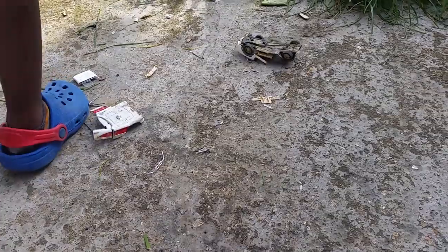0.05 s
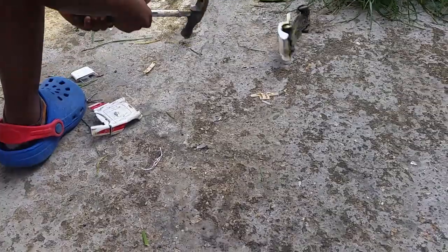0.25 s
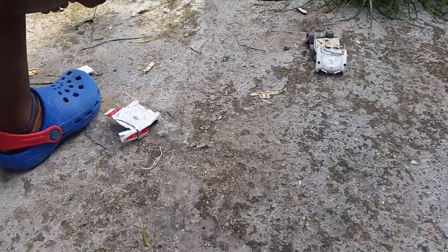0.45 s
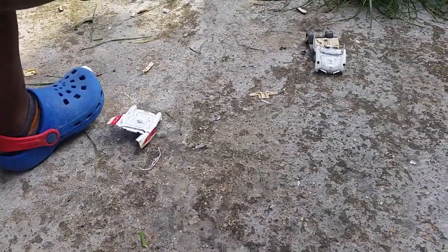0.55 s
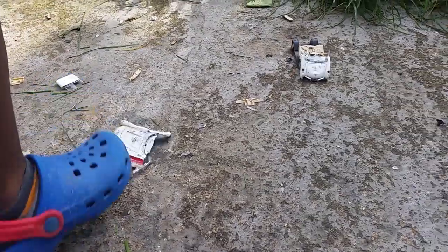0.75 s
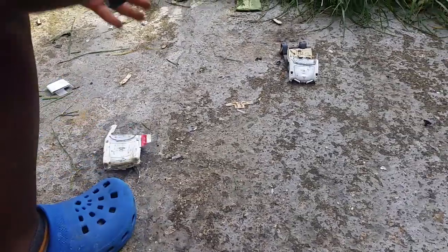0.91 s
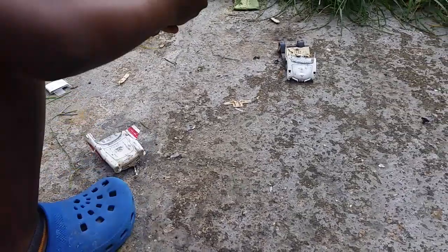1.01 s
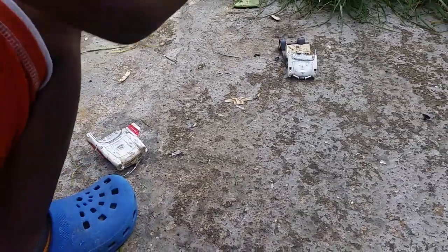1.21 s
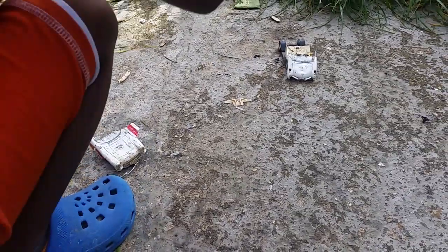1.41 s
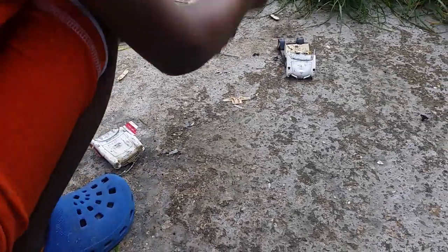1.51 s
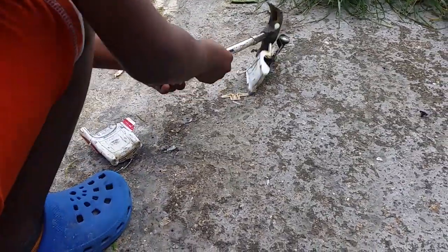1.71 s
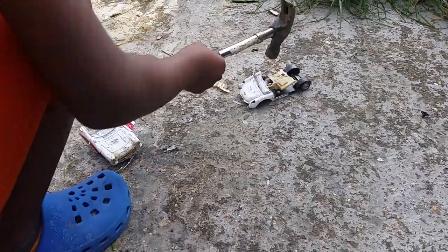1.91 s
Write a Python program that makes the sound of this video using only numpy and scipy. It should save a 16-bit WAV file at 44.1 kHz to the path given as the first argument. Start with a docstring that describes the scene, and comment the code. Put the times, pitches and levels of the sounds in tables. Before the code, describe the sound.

Close stereo microphone in a small yard: a shoe scuffs and a thin panel chatters, a hard hammer blow crunches a toy car with a hollow rebound, bits settle, clothes brush softly, then another blow and clatter.

```python
"""Toy car under the hammer

A hammer smashes a plastic toy car on a concrete yard, twice; the car jumps and clatters down.
Crunches, clacks and scrapes are shaped bursts of noise; thuds, knocks and pings are dying sines.
A clog scuffs the ground and nudges a loose panel, which chatters over the concrete.
Filtered noise gives rumble, brushing clothes, a thin whistle and the yard's short tail; low tones waver."""
import sys
import numpy as np
from scipy import signal
from scipy.fft import rfft, irfft
from scipy.io import wavfile
from scipy.ndimage import uniform_filter1d

SR = 44100
rng = np.random.default_rng(int(sys.argv[2]) if len(sys.argv) > 2 else 0)


def waveform_to_disk(signal):
    """Save audio, clipped to [-1, 1], as 16-bit WAV at the path in sys.argv[1]."""
    frames = np.transpose(np.atleast_2d(signal))
    scaled = np.clip(frames, -1, 1) * 32767
    samples = np.round(scaled).astype(np.int16)
    wavfile.write(sys.argv[1], SR, samples)


N = 85995
T = np.arange(N) / SR  # scene time [s]
AGE = T[:SR // 3]  # time since a single hit [s]
HZ = np.fft.rfftfreq(4096, 1 / SR)  # frequency grid of the colour filters [Hz]


def amp(db):
    """Decibels to gain."""
    return 10 ** (np.asarray(db) / 20)


def unit(x):
    """Scales to rms 1."""
    return x / np.sqrt(np.mean(x ** 2) + 1e-20)


def pan(db):
    """Left and right gains for a left-right difference."""
    return amp([[db / 2], [-db / 2]])


def read(points, hz):
    """Reads a (frequency, value) table on a log-frequency axis."""
    table_hz, value = np.transpose(points)
    return np.interp(np.log(hz + 1), np.log(table_hz), value)


def level(points):
    """Gain over the scene from (time, level) points."""
    return amp(np.interp(T, *np.transpose(points)))


def onset(rise_s):
    """Straight rise from silence to full level."""
    return np.minimum(AGE / rise_s, 1)


def add(mix, s, sound):
    """Mixes a sound in at a time, trimming what falls outside the scene."""
    at = round(s * SR)
    sound = sound[..., max(-at, 0):]
    part = mix[:, max(at, 0):][:, :sound.shape[-1]]
    part += sound[..., :part.shape[1]]


def minimum_phase(log_gain):
    """Full spectrum of the causal filter whose energy comes earliest for this gain."""
    mirrored = np.r_[log_gain, log_gain[-2:0:-1]]
    return np.exp(np.conj(signal.hilbert(mirrored)))


def colour(x, db):
    """Causal filter of unit energy, shaped by the given gain over HZ."""
    taps = np.fft.ifft(minimum_phase(np.log(amp(db)))).real[:len(HZ)]
    return signal.oaconvolve(x, taps[None] / np.linalg.norm(taps), axes=1)[:, :N]


def dull(x, hz):
    """A soft contact carries little treble: a steep low-pass."""
    return signal.sosfilt(signal.butter(5, hz, fs=SR, output="sos"), x)


def lag(x, s):
    """The right microphone hears a source on the left a little later."""
    late = np.exp(-2j * np.pi * np.fft.rfftfreq(2 * N, 1 / SR) * s)
    right = irfft(rfft(x[1], 2 * N) * late)[:N]
    return np.array([x[0], right])


def pair(likeness, size):
    """Left and right noises with the given correlation."""
    a, b = rng.standard_normal((2, size))
    return np.array([a, likeness * a + np.sqrt(1 - likeness ** 2) * b])


LIKENESS = 0.33  # left-right correlation of grit and crumbs
GRIT_DB = 2  # unevenness of the grit, rms [dB]


def grit(db, rise, hold, t60):
    """A burst of tiny slips and fractures that rises, holds and dies."""
    wander = unit(uniform_filter1d(rng.standard_normal(len(AGE)), size=24))
    clumps = unit(amp(GRIT_DB * wander))
    fade_db = -60 * np.maximum(AGE - rise - hold, 0) / t60
    return pair(LIKENESS, len(AGE)) * clumps * onset(rise) * amp(db + fade_db)


RIPPLE_HZ = 149.66  # spacing of the random peaks and dips in tone [Hz]


def uneven_tone(x, ripple_db):
    """Each burst gets its own random uneven tone colour."""
    hz = np.fft.rfftfreq(len(AGE), 1 / SR)
    heights = np.tanh(rng.standard_normal(len(HZ)))
    ripple = np.interp(hz / RIPPLE_HZ, np.arange(len(HZ)), heights)
    response = minimum_phase(np.log(unit(amp(ripple_db * ripple))))
    return np.fft.ifft(np.fft.fft(x) * response).real


def ring(modes, pitch=1):
    """Struck modes dying away; pitch multiplies their frequencies."""
    out = np.zeros(len(AGE))
    for hz, db, t60 in modes:
        out += amp(db - 60 * AGE / t60) * np.sin(2 * np.pi * hz * pitch * AGE)
    return out


BLOW_LAG_S = .00029  # later arrival of the blows at the right microphone
# hammer crushing the car: (time [s], level [dB], hold [s], fade t60 [s])
CRUSHES = [(0.2317, -8.5, 0.0036, 0.063), (0.2417, -13.5, .002, 0.033), (1.6699, -28.5, 0.006, .035),
           (1.692, -35.5, 0.0055, 0.16), (1.711, -40.5, 0.0083, 0.17)]
# tone of the crunch: (frequency [Hz], relative level [dB])
CRUSH_COLOUR = [(150, -15), (500, -1), (1400, 4), (2400, -0.5), (4000, 1.5), (6500, 6), (9000, -1),
                (12000, -2), (14800, 4.5), (16000, 2)]
# thuds of the hammer, the car and a foot on the ground:
# (time [s], level [dB], pitch [Hz], t60 [s], left-right difference [dB])
THUDS = [(0.234, -6, 412, 0.019, -4), (0.2321, -10, 215, 0.019, -3.5), (0.2423, -10, 121, 0.0089, -29.5),
         (0.2434, -9.5, 363, 0.0071, -7), (.320, -27.5, 79.5, 0.077, -1), (.526, -42, 55, 0.11, -1),
         (0.971, -34.5, 135, 0.031, 0), (1.6724, -12.5, 361.6, 0.015, -2), (1.68, -29, 90, 0.041, -7)]


def hammer(crack_s=0.00063, push_s=0.00077):
    """Plastic crunches as bursts of fractures under the head; the ground thuds as dying sines."""
    crunch, thuds = np.zeros((2, 2, N))
    for s, db, hold, t60 in CRUSHES:
        add(crunch, s, uneven_tone(grit(db, crack_s, hold, t60), ripple_db=4.5))
    for s, db, hz, t60, side_db in THUDS:
        add(thuds, s, pan(side_db) * onset(push_s) * ring([(hz, db, t60)]))
    return pan(db=-1.05) * colour(crunch, read(CRUSH_COLOUR, HZ)) + thuds


REBOUND_S, REBOUND_DB = .2677, -8.5
# hollow modes of the rebounding piece: (frequency [Hz], relative level [dB], t60 [s])
REBOUND_MODES = [(450, 1, 0.018), (1060, 0, 0.014), (1292, 3, 0.014), (1680, -4.5, .012)]


def rebound(edge_hz=2000, rise_s=0.00065):
    """One loud, hollow knock as a piece rebounds: a few modes with the click filtered away."""
    out = np.zeros((2, N))
    add(out, REBOUND_S, amp(REBOUND_DB) * onset(rise_s) * ring(REBOUND_MODES))
    return dull(out, edge_hz)


# the car landing and rocking: (time [s], level [dB], t60 [s], ring relative to the clack [dB])
CLACKS = [(0.31, -45, .02, -15), (.3167, -25.5, 0.018, -9), (0.4054, -35.5, 0.042, -2),
          (0.442, -59, 0.037, -21), (0.5093, -40, 0.061, -10), (0.5264, -39, 0.027, -23),
          (0.9679, -49, 0.035, -18), (1.781, -47, 0.072, -32), (1.794, -48.5, 0.047, -11),
          (1.813, -52.5, 0.11, -18), (1.829, -43, 0.027, -14), (1.839, -44, 0.14, -13),
          (1.8478, -33.5, 0.03, -4.5), (1.898, -54, 0.07, -18), (1.9127, -50.5, .018, -25),
          (1.93, -56, 0.024, -5)]
# tone of the clacks, shared by the crumbs: (frequency [Hz], relative level [dB])
CLACK_COLOUR = [(150, -18), (500, 5.5), (1400, 6), (2200, 5.5), (4000, 5), (6500, 10.5), (9000, -1),
                (12500, 1.5), (15000, 5.5), (16000, -2)]
# chassis modes: (frequency [Hz], relative level [dB], t60 [s])
CAR_MODES = [(423.7, -2, 0.027), (932, 3, 0.015), (1190, -0.5, .03)]
# a steel axle pinging on two hard landings: (time [s], level [dB])
PINGS = [(.406, -48), (1.848, -50)]
# axle modes: (frequency [Hz], relative level [dB], t60 [s])
AXLE_MODES = [(1518, 0, .115), (2630, -4, .08), (3844, -12, .08)]


def car(contact_s=0.00069):
    """Each landing is a gritty clack and a knock of the chassis modes; two also ring an axle."""
    clacks, rings = np.zeros((2, 2, N))
    for s, db, t60, ring_db in CLACKS:
        add(clacks, s, grit(db, contact_s, 0.00086, t60))
        add(rings, s, amp(db + ring_db) * ring(CAR_MODES) / 2)
    for s, db in PINGS:
        add(rings, s, amp(db) * ring(AXLE_MODES))
    clacks = pan(db=-1.5) * colour(clacks, read(CLACK_COLOUR, HZ))
    return lag(clacks, BLOW_LAG_S) + pan(db=3.5) * rings


CRUMBS_PER_S, CRUMB_SPREAD_DB, CRUMB_T60_S = 57, 2.5, .014
# how loudly crumbs fall: (time [s], level [dB])
CRUMB_LEVEL = [(.25, -68), (.36, -58), (.6, -55.5), (.8, -71), (1.05, -70.5), (1.3, -105), (1.66, -105),
               (1.69, -50), (1.95, -68.5)]


def crumbs():
    """Splinters and grit patter down: randomly timed short ticks of noise, loudest after the blows."""
    landed = rng.random(N) < CRUMBS_PER_S / SR
    sizes = amp(CRUMB_SPREAD_DB * rng.standard_normal(N))
    falls = landed * sizes * level(CRUMB_LEVEL)
    fades = signal.oaconvolve(falls, amp(-60 * AGE / CRUMB_T60_S))[:N]
    return colour(fades * pair(LIKENESS, N), read(CLACK_COLOUR, HZ))


# the loose panel chattering over concrete: (time [s], level [dB], rise [s], hold [s], t60 [s])
CHATTERS = [(-.004, -40.5, 0.0045, 0.005, 0.059), (0.0211, -26.5, 0.0018, 0.0012, .022),
            (.031, -36.5, 0.0016, .004, 0.12), (0.045, -29, .001, 0.0025, 0.052),
            (0.143, -35, .008, 0.014, .025), (0.256, -34.5, 0.0018, 0.03, 0.18),
            (0.5542, -43, 0.00066, 0.0012, 0.036), (0.563, -43.5, 0.0025, 0.0016, 0.044),
            (0.577, -47, .003, 0.0074, 0.028), (.586, -44, 0.0025, 0.0018, 0.024),
            (0.613, -49, 0.0059, 0.018, 0.033), (0.664, -60, 0.0031, 0.0054, 0.043),
            (0.807, -45, 0.0055, 0.0085, 0.036), (0.853, -40, 0.0012, 0.0049, 0.047),
            (0.88, -39, 0.0039, 0.0047, 0.086), (0.901, -44.5, 0.0048, 0.0052, 0.13),
            (0.932, -44, .003, .003, 0.053), (1.066, -53, .001, .004, 0.075),
            (1.105, -55.5, 0.0021, .006, .04), (1.11, -55, 0.0039, 0.0063, 0.075),
            (1.164, -76, 0.0042, 0.0069, 0.095), (1.711, -38.5, 0.0044, 0.0055, 0.043)]
# broad tone of the panel: (frequency [Hz], relative level [dB])
PANEL_COLOUR = [(200, -22.5), (1000, -11), (1800, -8), (2900, -5.5), (4200, -14.5), (5400, -4.5), (7000, 5),
                (8200, 0), (9000, -11), (10500, -8.5), (12700, -4), (15000, -8), (16000, -6.5)]
# resonances of the panel: (frequency [Hz], width [Hz], lift [dB])
PANEL_MODES = [(2130, 130, 6), (2900, 170, 7.5), (3130, 98, 4.5), (5490, 220, 10.5), (6180, 130, 9),
               (6700, 63, 6.5), (7060, 97, 5), (7510, 63, 3.5), (8070, 100, 4.5), (10070, 130, 11),
               (11100, 130, 5.5), (14500, 130, 7)]


def panel():
    """Short slips on concrete excite the resonances of the thin panel."""
    slips = np.zeros((2, N))
    for s, db, rise, hold, t60 in CHATTERS:
        add(slips, s, uneven_tone(grit(db, rise, hold, t60), ripple_db=8.5))
    lift = sum(db / (1 + (2 * (HZ - hz) / width) ** 2) for hz, width, db in PANEL_MODES)
    return pan(db=-1.0) * colour(slips, read(PANEL_COLOUR, HZ) + lift)


SCUFF_S, SCUFF_DB = .066, -30.5
SCUFF_RISE_S, SCUFF_HOLD_S, SCUFF_T60_S = 0.029, 0.07, 0.12
# tone of the sole on sand: (frequency [Hz], relative level [dB])
SOLE_COLOUR = [(100, 14.5), (300, 0.5), (900, -2.5), (1800, -5.5), (2500, -7), (4300, -2.5), (5100, -7),
               (7200, -2), (9000, -11.5), (11000, 0), (12500, -6), (14800, 3), (16000, 1.5)]


def scuff(catch_db=1):
    """A sole drags over sandy concrete; the noise swells and dips as it catches on the grains."""
    sand = np.zeros((2, N))
    catches = amp(catch_db * unit(uniform_filter1d(rng.standard_normal(len(AGE)), size=130)))
    drag = uneven_tone(grit(SCUFF_DB, SCUFF_RISE_S, SCUFF_HOLD_S, SCUFF_T60_S), ripple_db=9)
    add(sand, SCUFF_S, catches * drag)
    return pan(db=4.0) * colour(sand, read(SOLE_COLOUR, HZ))


# tone of the yard tail: (frequency [Hz], relative level [dB])
YARD_COLOUR = [(100, -4.5), (380, 4.5), (800, -1), (1500, -1.5), (3000, 4), (7000, -1), (15000, 2)]
# how fast the tail dies: (frequency [Hz], t60 [s])
YARD_T60 = [(100, 0.33), (500, 0.17), (1500, 0.21), (4000, 0.28), (8000, 0.21), (16000, 0.083)]
YARD_DELAY_S = 0.0063


def yard(x):
    """A diffuse tail from the walls: decaying noise, each band dying at its own speed."""
    hz, t, noise = signal.stft(rng.standard_normal((2, SR // 2)), SR, nperseg=256)
    decay_db = read(YARD_COLOUR, hz)[:, None] - 60 * t / read(YARD_T60, hz)[:, None]
    tail = signal.istft(noise * amp(decay_db), SR)[1]
    wet = np.zeros((2, N))
    add(wet, YARD_DELAY_S, signal.fftconvolve(x, tail / np.linalg.norm(tail[0]), axes=1))
    return wet


# dull knocks of the car and the foot: (time [s], level [dB], pitch [Hz])
KNOCKS = [(0.9637, -34.5, 537), (1.6934, -22.5, 420), (1.7, -30, 503), (1.7113, -25, 540),
          (1.7245, -22.5, 490), (1.7377, -36, 530), (1.748, -30.5, 430)]
# modes of a knock: (pitch ratio, relative level [dB], t60 [s])
KNOCK_MODES = [(.55, -3, .014), (1, 0, .011), (2.3, -3, .009)]


def knocks(rise_s=0.00078, edge_hz=1800, yard_db=-14):
    """Short, dull knocks as things jostle: low-passed modes with a yard tail of their own."""
    out = np.zeros((2, N))
    for s, db, hz in KNOCKS:
        add(out, s, amp(db) * onset(rise_s) * ring(KNOCK_MODES, hz))
    out = dull(out, edge_hz)
    return out + amp(yard_db) * yard(out)


# tone of the rumble: (frequency [Hz], relative level [dB])
RUMBLE_COLOUR = [(20, 0.5), (45, -1.5), (85, 1.5), (130, -2), (190, -5), (280, -13), (500, -22.5),
                 (1000, -30), (2000, -47.5), (3300, -43.5), (8000, -65.5), (16000, -61.5)]
# rumble over the scene: (time [s], level [dB])
RUMBLE_LEVEL = [(0, -40), (.17, -44), (.35, -44.5), (.45, -51), (.53, -54), (.75, -56.5), (.92, -57),
                (1.28, -57), (1.5, -49.5), (1.65, -49), (1.8, -55.5), (1.95, -58)]


def rumble():
    """Air rumbles on the microphone: low noise, largely alike on both sides."""
    return pan(db=1.0) * level(RUMBLE_LEVEL) * colour(pair(0.79, N), read(RUMBLE_COLOUR, HZ))


# tone of the clothes: (frequency [Hz], relative level [dB])
CLOTH_COLOUR = [(100, 8), (300, 11.5), (700, -5), (1300, -11), (2200, -37.5), (3300, -48), (6000, -46),
                (16000, -54.5)]
# brushing over the scene: (time [s], level [dB])
CLOTH_LEVEL = [(1.2, -76), (1.4, -69.5), (1.53, -59), (1.66, -59.5), (1.72, -93)]


def cloth():
    """Clothes brush close by: soft, dark noise that swells and fades."""
    return level(CLOTH_LEVEL) * colour(pair(.8, N), read(CLOTH_COLOUR, HZ))


WHISTLE_HZ, WHISTLE_WIDTH_HZ = 15110, 220
# whistle over the scene: (time [s], level [dB])
WHISTLE_LEVEL = [(1.3, -115), (1.4, -70), (1.44, -78), (1.53, -60), (1.635, -65.5), (1.67, -115)]


def whistle():
    """A thin high whistle: noise squeezed into a narrow band."""
    narrow_db = -30 * np.log10(1 + ((HZ - WHISTLE_HZ) / WHISTLE_WIDTH_HZ * 2) ** 2 / 2)
    return level(WHISTLE_LEVEL) * colour(pair(.7, N), np.maximum(narrow_db, -80))


DRONE_DRIFT_HZ, DRONE_FADE_S = 4.5, .05  # rms pitch drift; fade at either end
# faint low drones: (start [s], end [s], pitch [Hz], level [dB])
DRONES = [(-.1, .23, 245, -43), (0.848, 1.66, 181, -58.5), (-0.0097, 2.03, 73, -57.5)]


def slow_noise():
    """A slow random wander of rms 1."""
    smooth = uniform_filter1d(rng.standard_normal(N), size=3000)
    return unit(uniform_filter1d(smooth, size=2000))


def drones(waver=.4):
    """Low sines waver slowly and randomly in pitch and level."""
    out = np.zeros(N)
    for start, end, hz, db in DRONES:
        pitch = hz + DRONE_DRIFT_HZ * slow_noise()
        swell = 1 + waver * slow_noise()
        gate = np.clip(np.minimum(T - start, end - T) / DRONE_FADE_S, 0, 1)
        out += amp(db) * gate * swell * np.sin(2 * np.pi * np.cumsum(pitch) / SR)
    return out


FEET_LAG_S = .0001  # later arrival of panel and scuff at the right microphone


def scene():
    """Blows and landings fill the yard more than the small sounds close by."""
    blows = lag(hammer() + crumbs(), BLOW_LAG_S) + car()
    feet = lag(panel() + scuff(), FEET_LAG_S)
    knock = rebound()
    tail = yard(amp(-17) * blows + amp(-21.5) * feet + amp(-16.5) * knock)
    background = rumble() + cloth() + whistle() + drones()
    return blows + feet + knock + knocks() + tail + background


CEILING = 1  # where the microphone overloads
CUTOFF_HZ = 16000


def record(dry):
    """The loudest peaks overload softly; then a low-pass sets the band limit."""
    held = CEILING * np.tanh(dry / CEILING)
    band = signal.firwin(201, CUTOFF_HZ, window=("kaiser", 8), fs=SR)
    return signal.oaconvolve(held, band[None], "same")


dry = scene()
out = record(dry)
waveform_to_disk(out)
```